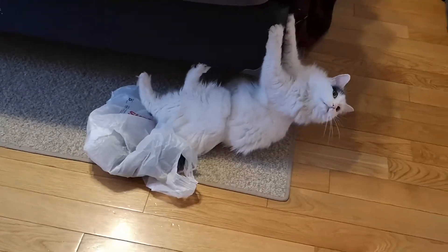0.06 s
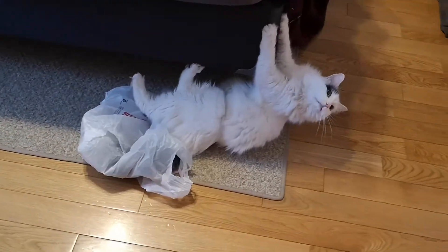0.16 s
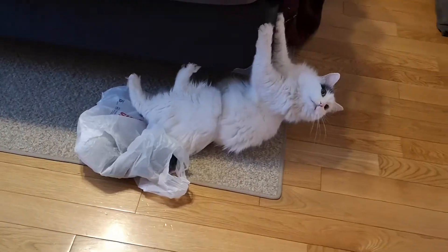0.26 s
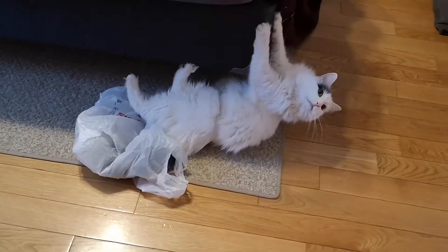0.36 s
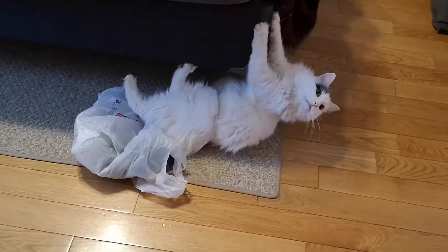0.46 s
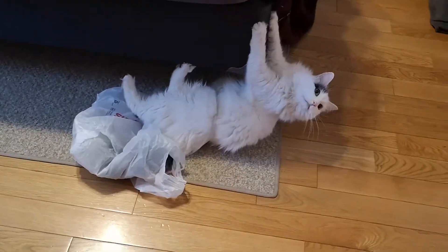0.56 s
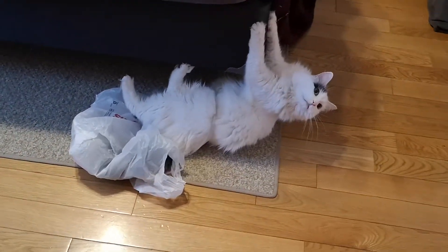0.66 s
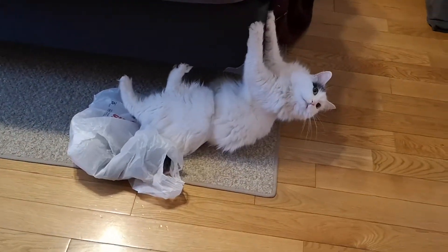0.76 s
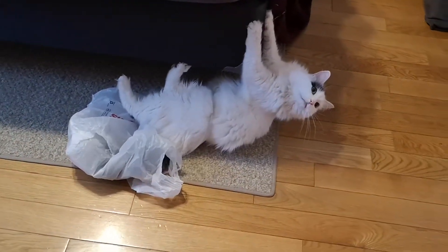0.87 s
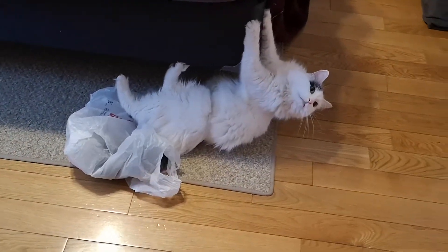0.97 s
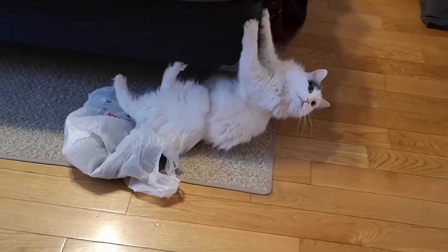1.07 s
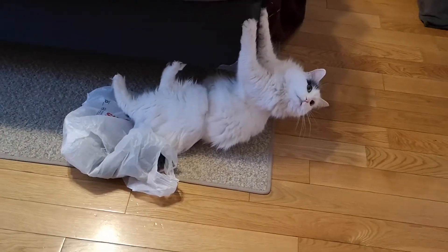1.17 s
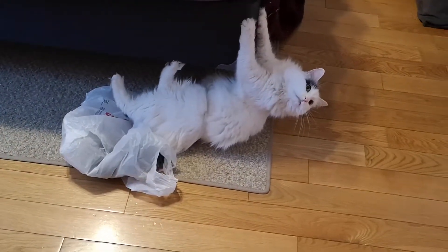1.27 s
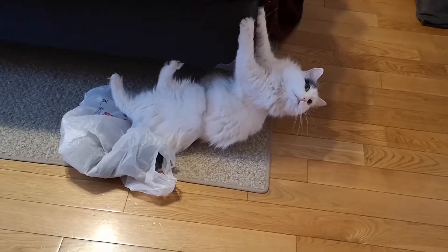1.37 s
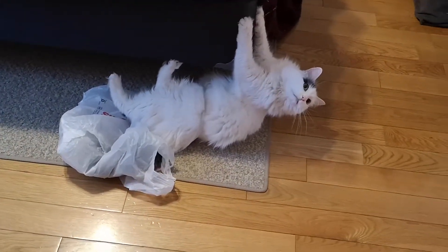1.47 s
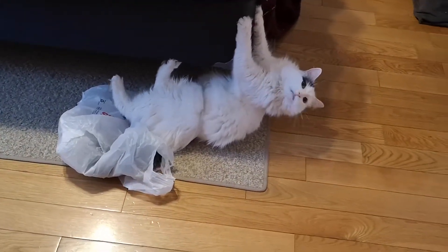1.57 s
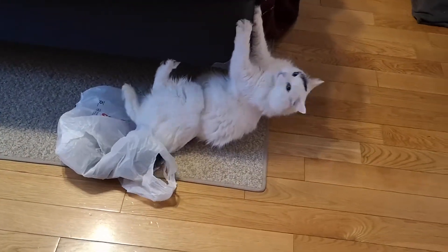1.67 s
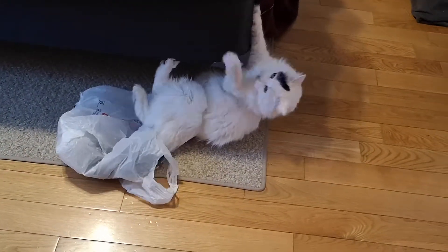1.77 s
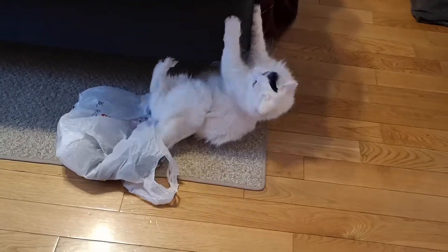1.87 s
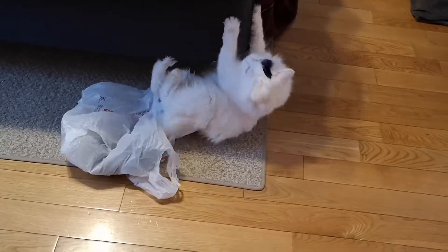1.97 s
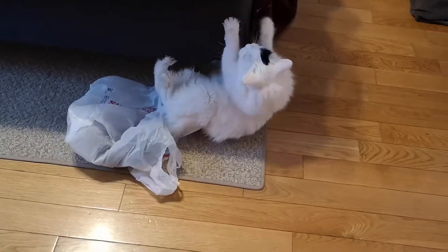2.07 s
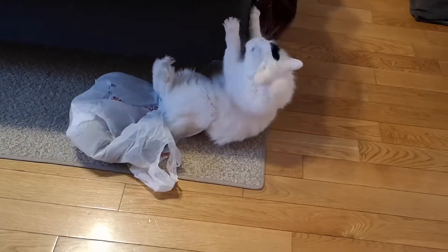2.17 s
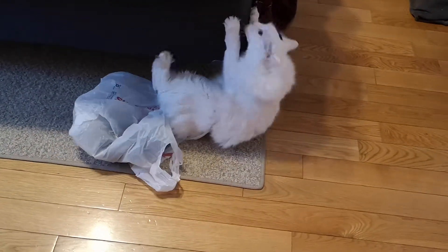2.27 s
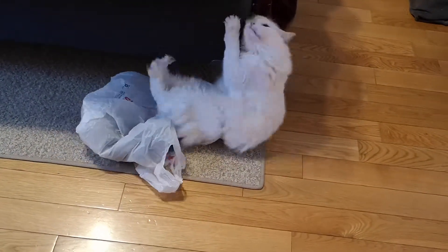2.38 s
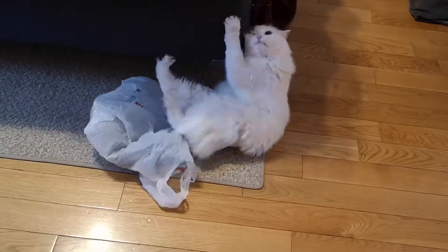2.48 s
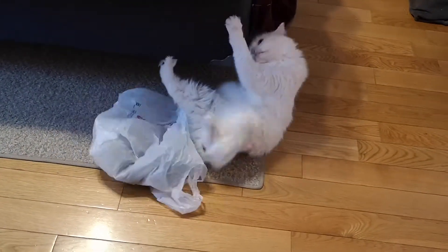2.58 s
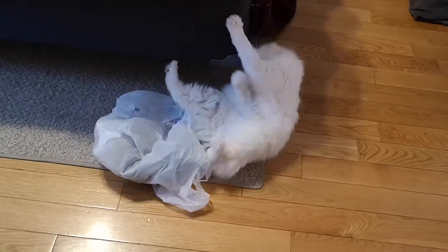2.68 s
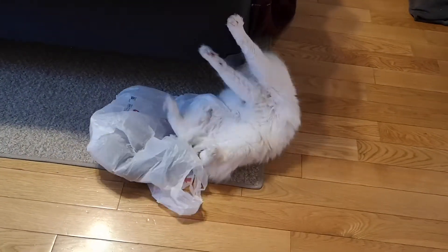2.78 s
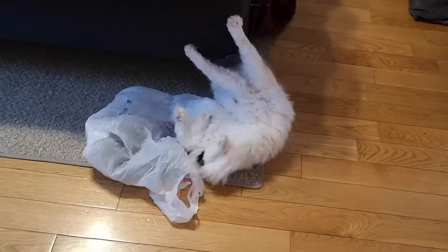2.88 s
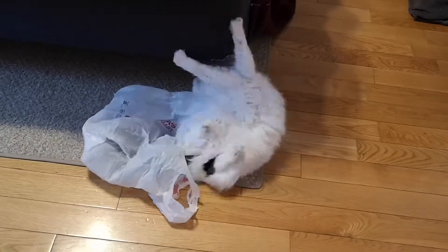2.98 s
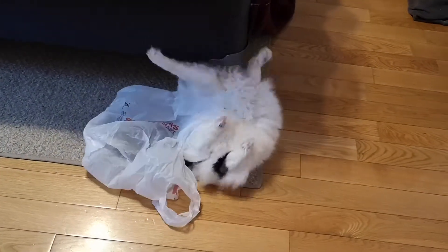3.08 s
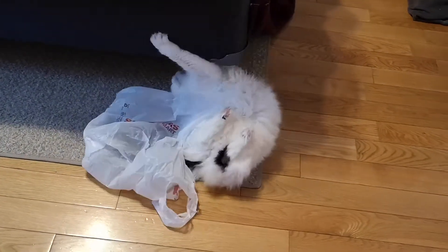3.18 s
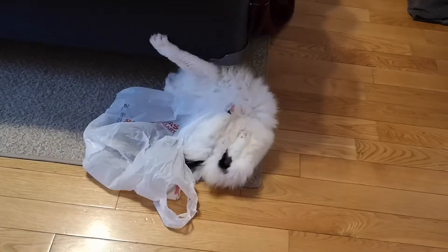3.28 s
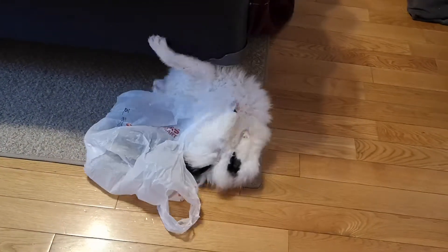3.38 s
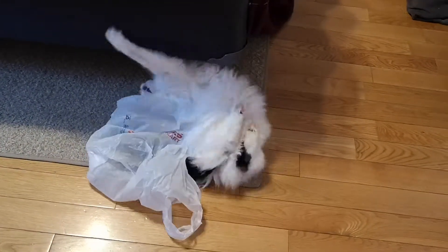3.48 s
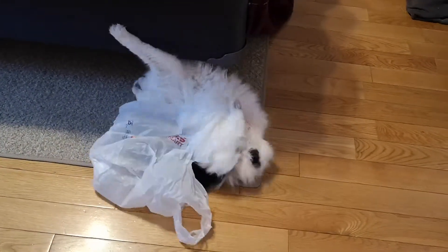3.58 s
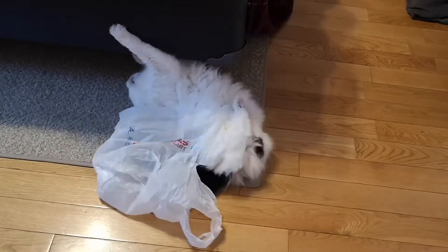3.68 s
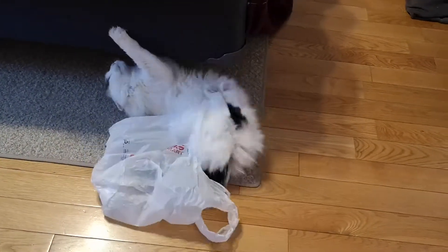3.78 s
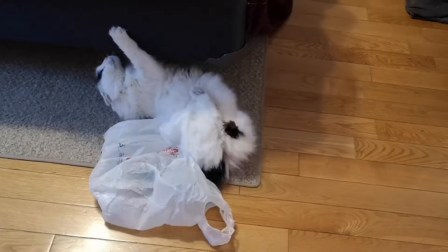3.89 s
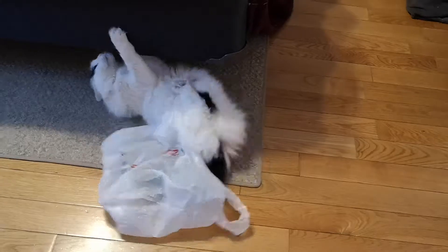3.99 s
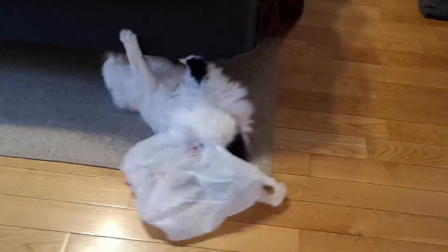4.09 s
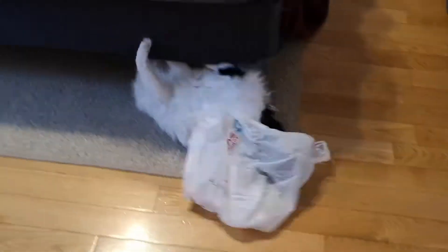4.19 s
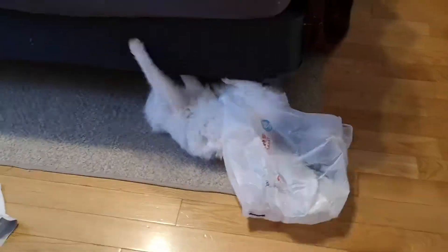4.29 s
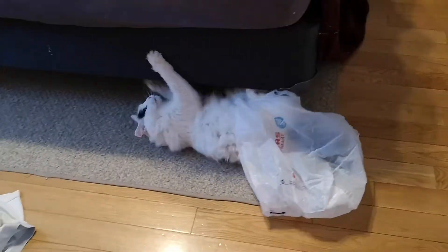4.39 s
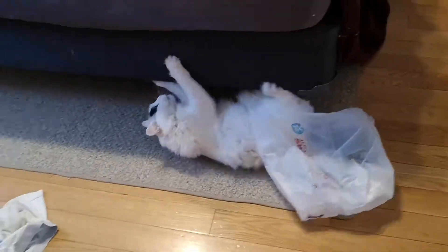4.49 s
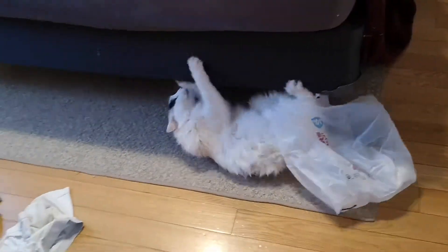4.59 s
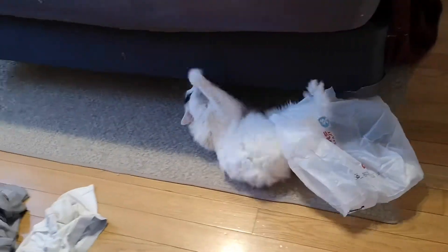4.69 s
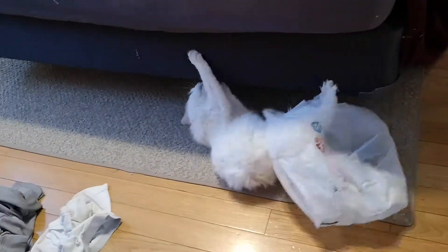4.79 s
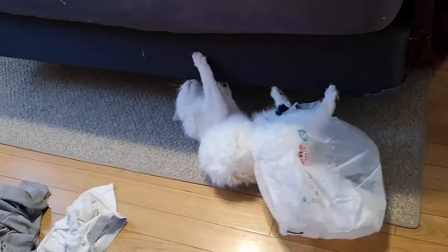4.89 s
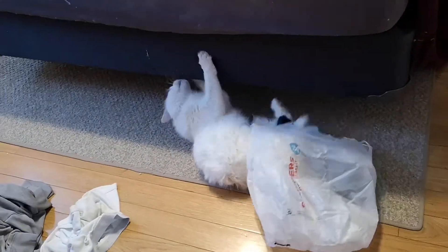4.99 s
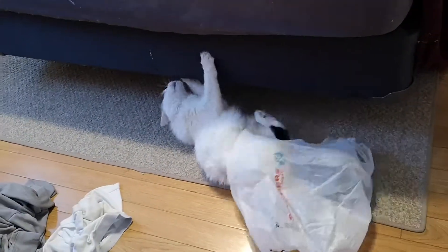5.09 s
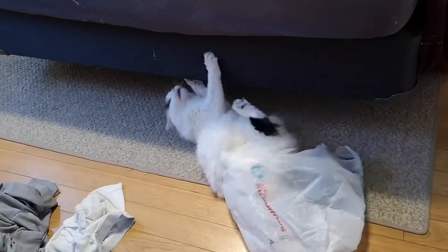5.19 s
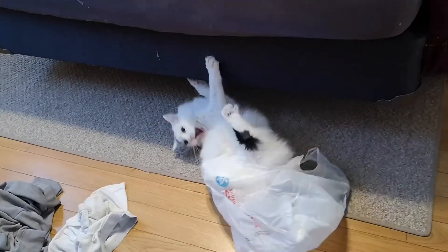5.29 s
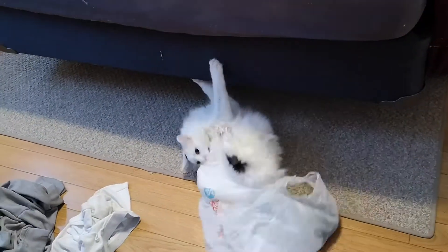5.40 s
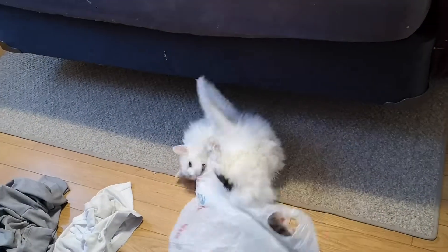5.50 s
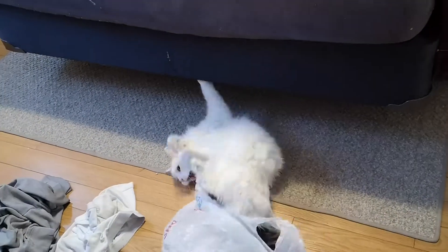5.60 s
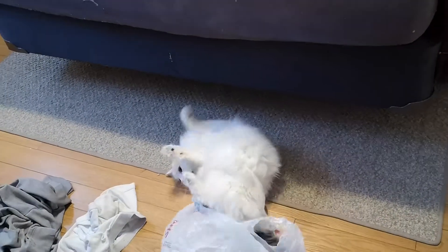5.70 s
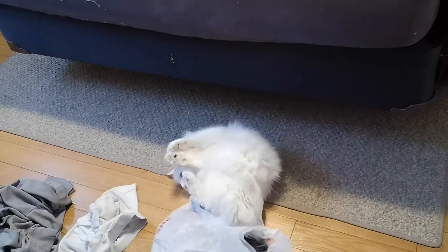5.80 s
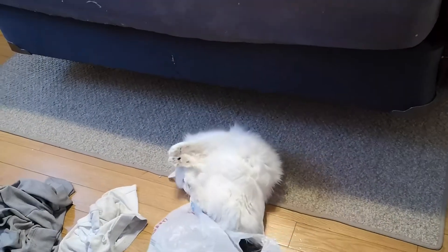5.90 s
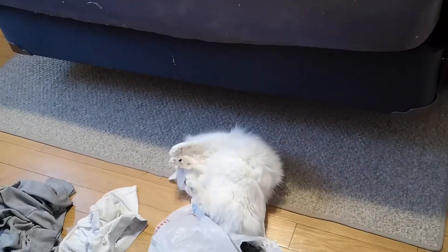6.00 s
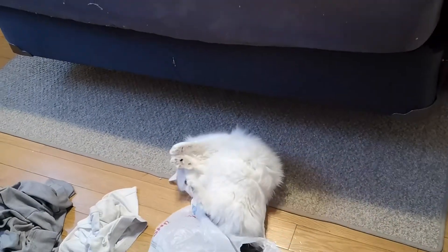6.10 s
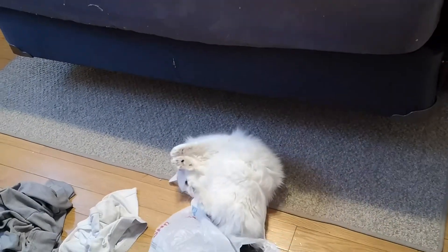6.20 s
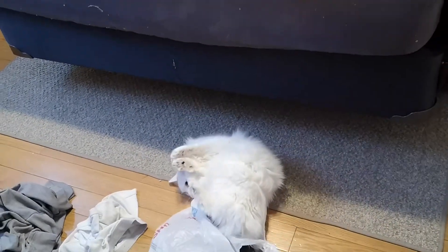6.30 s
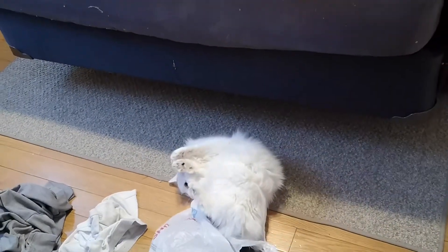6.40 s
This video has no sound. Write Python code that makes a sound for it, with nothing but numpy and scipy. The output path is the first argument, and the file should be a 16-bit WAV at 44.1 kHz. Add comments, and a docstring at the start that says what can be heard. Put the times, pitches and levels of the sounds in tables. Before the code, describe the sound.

A quiet living room with a wooden floor and rug, heard in close hand-held stereo over a faint, bass-heavy steady background. Until 1.6 s there are only tiny plastic clicks around 0.2-0.4 s, and faint ticks near 0.8-1.2 s. At 1.6-1.7 s the cat kicks: a snap, two dull thumps and a brief crinkle. More thuds fall at 2.0 and 2.35 s, with rustling growing from 2.4 s. Around 3.0-3.15 s a cluster of knocks and booms comes with low puffs of air, another at 3.5 s over sustained crumpling. From 4.15 s heavy thuds, gusts and brighter rustles crowd together; a thump follows at 4.7 s, the loudest crumple at about 5.1-5.5 s, and strong thuds at 5.5 s. After 5.7 s rustling dwindles, with a crisp snap at 5.9 s and faint clicks near 6.3 s.

```python
"""A living room with a wooden floor and a rug, heard from a hand-held stereo pair over a faint steady background.
At first the cat lies almost still: lone creases of the thin plastic bag on its hind legs click, with small ticks.
From 1.6 s it rolls and kicks: swarms of buckling creases rustle, while blows slap, knock, thud and boom in
the floor and furniture as ringing modes and noise bursts. From 3 s stronger pushes of air join in, low and uneven.
The heaviest action lies between 4 and 5.7 s; then smaller rustles and a few lone clicks die away."""
import sys
import numpy as np
from scipy import signal
from scipy.fft import rfft, irfft, next_fast_len
from scipy.io import wavfile
from scipy.ndimage import map_coordinates

SR = 44100
rng = np.random.default_rng(int(sys.argv[2]) if len(sys.argv) > 2 else 0)


def bounce(signal):
    """Save signal as a 16-bit WAV file at the path given by the first command-line argument."""
    frames = np.transpose(np.atleast_2d(signal))
    limited = np.clip(frames, -1, 1)
    pcm = np.round(limited * 32767).astype(np.int16)
    wavfile.write(sys.argv[1], SR, pcm)


N = 284092  # samples

# spectrum of the film's small creases: f/Hz, level/dB per Hz
CREASE_SPECTRUM = [(900, -32), (2000, -9.5), (3300, -3.5), (4200, -4), (5700, -1), (6800, -3.5), (7700, -1),
                   (8400, -6), (9300, -1.6), (10200, -5.5), (11500, -6.5), (13000, -13), (15200, -19.5)]


def amp(db):
    """Decibels to gain."""
    return 10 ** (np.asarray(db) / 20)


def unit(x):
    """Scale to rms 1."""
    return x / np.sqrt(np.mean(x ** 2) + 1e-20)


def along(points, hz):
    """Read (f/Hz, value) points on a log frequency axis."""
    f, v = np.transpose(points)
    return np.interp(np.log(hz + 1), np.log(f + 1), v)


def wobble(rate):
    """A smooth random curve with rate knots a second."""
    knots = rng.standard_normal(int(N * rate / SR) + 4)
    return map_coordinates(knots, [np.arange(N) * rate / SR])


def swell(s, hold, rise_db_per_s, fall_db_per_s):
    """Attack, hold and release as a gain that reaches 1 at time s."""
    t = np.arange(N) / SR - s
    rise_db = np.minimum(rise_db_per_s * t, 0)
    fall_db = fall_db_per_s * np.maximum(t - hold, 0)
    return amp(np.maximum(rise_db - fall_db, -150))


def filtered(x, response):
    """Multiply the spectrum of x by a response of frequency."""
    n = x.shape[-1]
    m = next_fast_len(n + 8192)
    return irfft(rfft(x, m) * response(np.fft.rfftfreq(m, 1 / SR)), m)[..., :n]


def spread(pair, spectrum):
    """Colour two unrelated signals and share them as mid and side between the microphones; rms 1."""
    # how alike the two microphones hear a diffuse sound: f/Hz, left-right correlation
    likeness = [(40, .999), (150, 0.93), (300, 0.74), (650, -0.57), (1250, 0.55), (2100, -0.035),
                (10000, -0.062)]

    def mid_side_gains(hz):
        angle = np.arccos(np.clip(along(likeness, hz), -1, 1)) / 2
        return amp(along(spectrum, hz)) * np.array([np.cos(angle), np.sin(angle)])

    mid, side = filtered(pair, mid_side_gains)
    return unit(np.array([mid + side, mid - side]))


def noise(spectrum, size):
    """Coloured stereo noise of rms 1."""
    return spread(rng.standard_normal((2, size)), spectrum)


def add(track, s, sound):
    """Mix a sound into a track at time s."""
    part = track[:, max(round(s * SR), 0):][:, :sound.shape[-1]]
    part += sound[..., :part.shape[1]]


def in_room(x, wet_db, count=48):
    """Add the room's decaying diffuse tail; its fine pattern is drawn anew at regular short intervals."""
    # decay of the room: f/Hz, t60/s
    room_decay = [(100, 0.052), (500, 0.38), (2000, 0.34), (6000, 0.39), (14000, 0.34)]
    out, hop = np.zeros((2, N)), N // count
    padded = np.pad(x, ((0, 0), (0, 2 * hop)))
    # new draws avoid a static comb
    for start in range(0, N, hop):
        hz, t, bins = signal.stft(rng.standard_normal((2, SR // 3)), SR, nperseg=256)
        fading = bins * amp(-60 * t / along(room_decay, hz)[:, None])
        tail = signal.istft(fading, SR, nperseg=256)[1]
        tail = tail / np.linalg.norm(tail[0])
        add(out, start / SR, signal.fftconvolve(padded[:, start:start + hop], tail, axes=1))
    return (x + amp(wet_db) * out) / np.hypot(1, amp(wet_db))


def background():
    """Steady coloured noise, heaviest in the bass, stands for the quiet room."""
    # spectrum of the quiet room: f/Hz, level/dB per Hz
    quiet = [(10, -6.5), (28, 2), (40, -4), (55, 2.5), (85, -15.5), (120, -10), (160, -9.5), (250, -17),
             (630, -31), (1300, -30), (2100, -27), (3800, -34.5), (8400, -42), (15500, -46.5)]
    return amp(-62.5) * noise(quiet, size=N)


def rug(motion_db):
    """The cat's back rubs dully on the rug: low noise that follows the motion."""
    # spectrum of fur on the rug: f/Hz, level/dB per Hz
    rubbing = [(30, -14), (75, -0.5), (130, -3), (260, -8), (500, -28), (1500, -60)]
    middling_db, db_per_motion_db = -63.5, 0.59  # level when the motion is at -55 dB, and its growth
    level_db = middling_db + db_per_motion_db * (motion_db + 55) + 1.15 * wobble(18)
    return noise(rubbing, size=N) * amp(level_db)


def draught(motion_db):
    """Slow, uneven pushes of air reach both microphones alike, with a little rumble from the rug."""
    # air pushed as the body and the bag swing round: t/s, level/dB
    gusts = [(3.02, -35.5), (3.153, -32.5), (3.47, -36.5), (3.57, -34.5), (4.225, -24), (4.383, -32),
             (4.5, -51), (4.735, -28.5), (5.123, -33), (5.515, -27.5)]
    # a puff builds quickly and ebbs
    puffs = sum(amp(db) * swell(s, 0, rise_db_per_s=335, fall_db_per_s=129) for s, db in gusts)
    stir_db = -7.5  # air stirred by any movement, relative to the crumpling
    flow = np.hypot(puffs, amp(stir_db + motion_db))
    push_hz = 27 * amp(2.2 * wobble(25))
    push = np.sin(2 * np.pi * np.cumsum(push_hz) / SR)
    rumble = noise([(10, 8), (34, 12.0), (60, -19), (120, -12.5), (300, -18.5), (900, -77)], size=N)
    return flow * (push + rumble * amp(-5))


def ticks():
    """Light dry contacts: sines so damped that they ring for only a cycle or two."""
    # small ticks: t/s, level/dB, f/Hz
    contacts = [(0.822, -49, 510), (1.005, -51, 1450), (3.666, -46, 468), (4.061, -49.5, 560),
                (5.937, -47, 620)]
    out, t = np.zeros((2, N)), np.arange(SR // 20) / SR
    for s, db, hz in contacts:
        add(out, s, amp(db) * np.sin(2 * np.pi * hz * t) * np.exp(-1.8 * hz * t))
    return out


def burst(spectrum, t60, room_db, room_t60):
    """A short contact noise with its diffuse echo; decay times in seconds."""
    t = np.arange(SR // 2) / SR
    direct = amp(-60 * t / t60)
    echo = amp(room_db - 60 * t / room_t60)
    onset = 1 - np.exp(-t / 0.00064)
    return noise(spectrum, size=len(t)) * np.hypot(direct, echo) * onset


def ring(modes, rise, vary_db, room_db, room_t60):
    """Modes struck at a new place each time, with a diffuse echo of the same colour."""
    t = np.arange(SR // 2) / SR
    hz, db, t60 = np.transpose(modes)[:, :, None]
    detune, start, strength = rng.standard_normal((3, len(modes), 1))
    phase = 2 * np.pi * hz * (1 + 0.025 * detune) * t + 1.69 * start
    direct = np.sum(amp(db + vary_db * strength - 60 * t / t60) * np.sin(phase), axis=0)
    # the echo follows the modes and falls away steeply on both sides of them
    low, high = modes[0][0], modes[-1][0]
    below = [(low / 2, -90), (low * 0.61, -9)]
    above = [(high * 1.72, -22), (high * 5, -90)]
    colour = below + [row[:2] for row in modes] + above
    echo = noise(colour, size=len(t)) * amp(room_db - 60 * t / room_t60)
    # the first thirtieth of a second sets the level of the modes, ahead of the gradual onset
    return (direct / np.std(direct[:SR // 30]) + echo) * (1 - np.exp(-t / rise))


def blows():
    """Each blow shoves and slaps the surface, knocks the frame, thuds in the boards and booms in the joists."""
    # paws and body; a heavier, softer limb pushes lower: t/s, force/dB, push f/Hz, contact hardness/dB
    strikes = [(1.624, -38.5, 68, -12), (1.712, -31, 91, -13.5), (2.012, -29.5, 126, -10),
               (2.342, -53.5, 200, 8.5), (2.352, -33, 90, -8), (2.915, -43.5, 100, -7),
               (2.971, -36, 95, -15), (3.0, -38, 119, -3.5), (3.012, -27.5, 110, -12),
               (3.135, -43, 220, -20), (3.149, -30, 44, -23.5), (3.463, -32.5, 205, -7),
               (3.466, -37.5, 45.4, -30), (3.849, -49, 262, -0.5), (3.87, -49.5, 202, -1.5),
               (3.978, -45.5, 130, -14), (4.148, -32, 79, -35), (4.196, -27, 142, -14),
               (4.254, -36.5, 131, -9), (4.329, -45.5, 250, -2), (4.384, -45, 179, -3),
               (4.477, -49.5, 184, 0.5), (4.712, -32, 175, -15), (4.965, -42, 175, -12),
               (5.484, -25.5, 162, -24), (5.515, -29, 196, -8), (5.677, -49, 277, -1)]
    # low modes of the floor: f/Hz, level/dB, t60/s
    floor = [(69.4, 0, 0.43), (86.3, -5, 0.29), (118.6, -0.5, 0.21), (138, 2, 0.27), (146, -17, 0.69)]
    # modes of the floor boards: f/Hz, level/dB, t60/s
    boards = [(167, -0.5, 0.26), (189.2, -7, 0.15), (220.8, 4, 0.19), (261.7, -2, 0.17), (305.8, -8, 0.3),
              (364.8, -9.5, 0.186), (403.8, -11, 0.18)]
    # modes of the furniture frame: f/Hz, level/dB, t60/s
    frame = [(533, -3, 0.011), (743, 0.5, 0.022), (920, -4, 0.055), (1135, 1, 0.012), (1196, -1, 0.043),
             (1315, -4, 0.078), (1475, -17, 0.054)]
    # spectrum of the slap: f/Hz, level/dB per Hz
    slapping = [(300, -2), (650, -7.5), (1100, -9), (1600, 5), (2100, 5.5), (2650, -1.5), (3200, -14),
                (4000, -14.5), (6000, -19), (14000, -32)]
    best_hz = np.array([47.3, 123.5, 236])  # pushes that joists, floor and boards answer best
    mismatch_db_per_octave = 8
    knock_grows = 0.32  # extra dB of frame knock for each dB of stronger contact
    slap_left_db = 0.5  # the paws strike a little to the left
    out, t = np.zeros((2, N)), np.arange(SR // 2) / SR
    for s, force_db, push_hz, hardness_db in strikes:
        # a slow push reaches the joists, a quick one stays in the boards, a hard one slaps and knocks
        octaves = np.abs(np.log2(best_hz / push_hz))
        boom_db, thump_db, thud_db = force_db - mismatch_db_per_octave * octaves
        contact_db = force_db + hardness_db
        knock_db = contact_db + knock_grows * (contact_db + 45)
        slap_db = contact_db + slap_left_db * np.array([[.5], [-.5]])
        # the surface is pushed in and springs back, quickly damped
        shove_hz = 190 * (1 + rng.normal(0, 0.2))
        shove = -np.sin(2 * np.pi * shove_hz * t) * amp(-60 * t / 0.027)
        boom_hz = 49.5 * (1 + rng.normal(0, 0.0435))
        boom = np.sin(2 * np.pi * boom_hz * t) * amp(-60 * t / 0.45) * (1 - np.exp(-t / 0.01))
        thump = ring(floor, rise=0.0075, vary_db=2.3, room_db=-7.5, room_t60=0.33)
        thud = ring(boards, rise=0.0057, vary_db=2.5, room_db=-6.5, room_t60=0.33)
        knock = ring(frame, rise=0.00051, vary_db=5.0, room_db=5.5, room_t60=0.23)
        slap = burst(slapping, t60=0.023, room_db=-3.0, room_t60=0.21)
        add(out, s, amp(thud_db + 9.5) * shove)
        add(out, s, amp(boom_db + 8.5) * boom)
        add(out, s, amp(thump_db - 2.5) * thump)
        add(out, s, amp(thud_db + 1.0) * thud)
        add(out, s, amp(knock_db - 10.0) * knock)
        add(out, s, amp(slap_db + 3.0) * slap)
    return out


def snaps():
    """Lone creases click over in the bag as short noise bursts."""
    # single creases letting go: t/s, level/dB
    clicks = [(0.205, -61), (0.2877, -61), (0.349, -58), (0.3744, -62), (1.1847, -64), (1.5948, -53),
              (1.71, -47), (4.9651, -51), (5.877, -43.5), (6.2995, -53.5), (6.378, -57)]
    out = np.zeros((2, N))
    for s, db in clicks:
        click = burst(CREASE_SPECTRUM, t60=0.016, room_db=-7.5, room_t60=0.2)
        add(out, s, amp(db - 6.5) * click)
    return out


def crumpling():
    """Levels in dB of creases and broad panels: the powers of all moves add to a faint stir at rest."""
    # kicks, rolls and small stirs: t/s, hold/s, level/dB, broad panels over creases/dB
    moves = [(1.628, 0.0087, -60, 1), (1.678, 0.053, -62, -3.5), (1.921, 0.2, -60.5, -2),
             (2.18, 0.23, -69, .5), (2.426, 0.1, -57, -1), (2.618, 0.24, -54.5, -1),
             (2.974, 0.13, -55, -1.5), (3.19, 0.23, -65.5, -1.5), (3.46, 0.56, -55, -2.5),
             (4.147, 0.15, -53, 1), (4.29, 0.056, -47.5, 3), (4.483, 0.31, -55.5, 3),
             (4.977, 0.038, -59.5, 4), (5.093, 0.16, -47.5, -0.5), (5.27, 0.029, -38.5, 1.5),
             (5.403, 0.17, -48, 0.5), (5.709, 0.0095, -58.5, -1), (5.858, 0.27, -67.5, 2),
             (6.214, 0.097, -78.5, 2.5)]
    rest_db = -92.5
    creases, panels = np.full((2, N), amp(rest_db) ** 2)
    for s, hold, db, flutter_db in moves:
        # the film tightens fast and slackens more slowly
        power = (amp(db) * swell(s, hold, rise_db_per_s=285, fall_db_per_s=112)) ** 2
        creases += power
        panels += power * amp(flutter_db) ** 2
    return 10 * np.log10(creases), 10 * np.log10(panels)


def buckles(rate, scatter_db):
    """Random snaps at a rate per second, each aimed differently at the two microphones."""
    happens = rng.random(N) < rate / SR
    sizes = amp(scatter_db * np.clip(rng.standard_normal(N), -2, 2))
    return happens * sizes * rng.standard_normal((2, N)) / np.sqrt(rate / SR)


def bag(motion_db, panel_db):
    """Faster motion buckles more creases a second; they swell in clumps as folds give way."""
    # the bag turns towards the microphones when the cat rolls over: t/s, lift of the sheen/dB
    turning = [(1.8, -2), (3.9, -5), (4.4, 4), (4.8, 1), (5.15, -0.5), (5.5, 4), (6.2, -2)]
    # spectrum of the broad panels: f/Hz, level/dB per Hz
    panel_spectrum = [(200, -18), (450, -11.5), (750, -13.5), (1150, -8), (1500, -4.5), (1850, 0.8),
                      (2600, 0.1), (3200, -10.5), (4500, -14), (9000, -28)]
    turn_s, lift_db = np.transpose(turning)
    sheen_db = np.interp(np.arange(N) / SR, turn_s, lift_db)
    rate = 7000 * amp(.6 * (motion_db + 55))  # creases a second
    clumps = wobble(45)
    fine_db = motion_db + 2.5 + 2.0 * clumps + 0.12 * wobble(110)
    fine = spread(buckles(rate, scatter_db=-0.5), CREASE_SPECTRUM) * amp(fine_db)
    # a few stiff folds snap much harder than the rest
    stiff = spread(buckles(0.022 * rate, scatter_db=4), CREASE_SPECTRUM) * amp(motion_db - 10)
    creases = fine + stiff
    # the treble around 9.6 kHz is beamed: it grows when the film faces the microphones
    beamed = filtered(creases, lambda hz: np.exp(-((hz - 9600) / 2700) ** 2))
    sheen = beamed * (amp(sheen_db) - 1)
    # broad panels flip over more slowly and sound lower
    flutter_db = panel_db + 3.5 + 1.3 * clumps + 0.58 * wobble(30)
    panels = spread(buckles(.6 * rate, scatter_db=1.5), panel_spectrum) * amp(flutter_db)
    return in_room(creases + sheen + panels, wet_db=-3.0)


def scene():
    """Bag and cat, balanced between the two microphones, over the room's steady background."""
    # balance of the microphone pair: f/Hz, left minus right/dB
    balance = [(300, -.5), (700, 0), (1400, 2), (2000, 0), (2700, 5.5), (4300, -1), (6000, -2.5),
               (7900, 2.5), (9400, 10.5), (10500, 0.5), (11700, -5), (13000, -5.5), (15000, 2)]
    motion_db, panel_db = crumpling()
    cat = rug(motion_db) + draught(motion_db) + ticks() + blows()
    action = cat + snaps() + bag(motion_db, panel_db)
    left_right = np.array([[.5], [-.5]])
    return background() + filtered(action, lambda hz: amp(along(balance, hz) * left_right))


def record(dry):
    """The microphone pair's sound is cut off sharply at the band limit."""
    top_hz = 15350
    return filtered(dry, lambda hz: hz < top_hz)


dry = scene()
out = record(dry)
bounce(out)
```